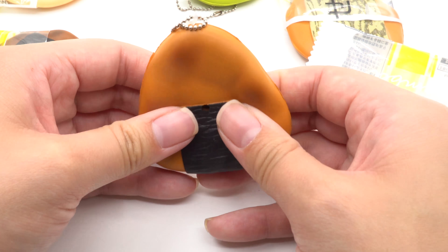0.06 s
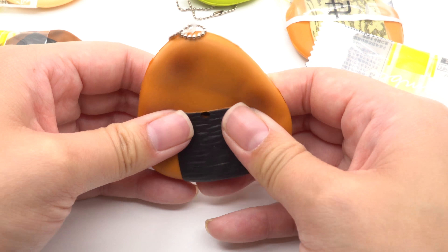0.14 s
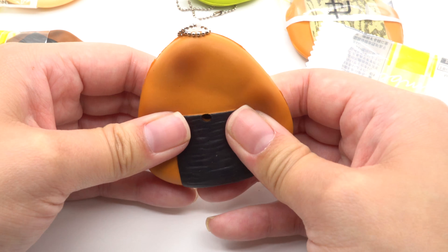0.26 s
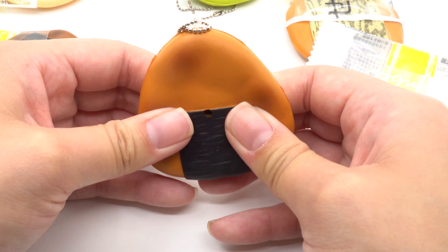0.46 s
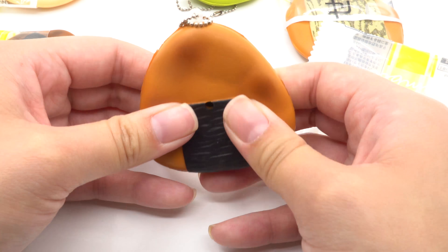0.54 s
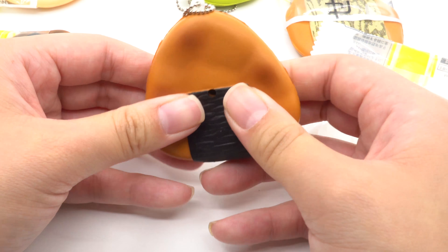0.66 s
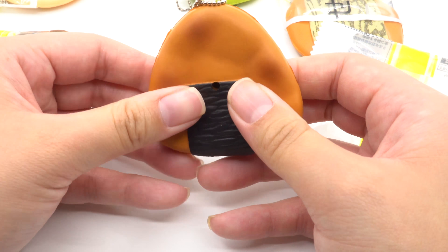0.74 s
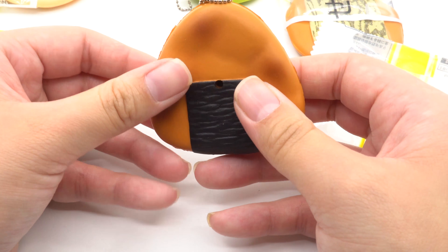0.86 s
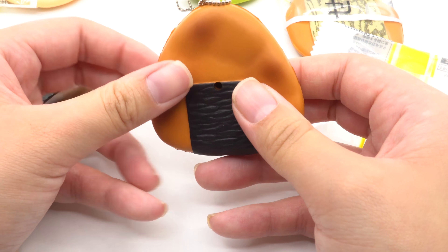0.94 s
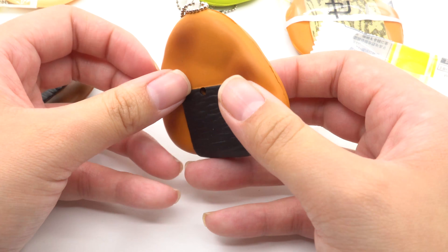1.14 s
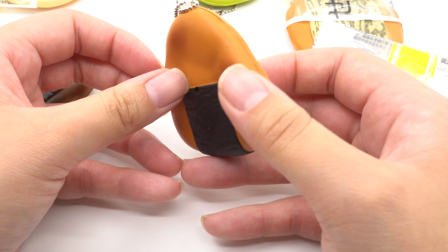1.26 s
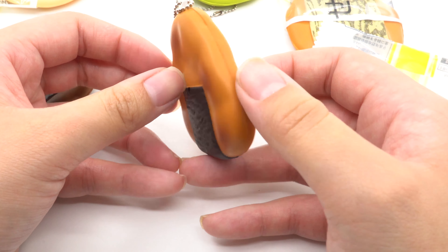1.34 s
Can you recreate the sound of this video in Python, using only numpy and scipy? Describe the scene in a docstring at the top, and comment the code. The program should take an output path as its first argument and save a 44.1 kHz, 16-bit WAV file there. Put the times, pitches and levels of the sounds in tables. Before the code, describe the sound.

A foam toy's stiff inner shell cracks once under the thumbs, then creaks faintly.

```python
"""A small quiet room: two thumbs press a foam toy with a stiff shell inside, close by, over a table.
The shell gives with a dull snap, then a sharp crack; each impulse excites its damped modes, and the
recoil of foam and hands adds a soft low thump. Before and after, stick-slip friction makes the shell
creak faintly, and the fingers rub and squeak on the toy's skin. Table and room reflect the snaps and
creaks. Low rumble, a little hum and hiss lie underneath."""
import sys
import numpy as np
from scipy import signal
from scipy.io import wavfile

SR = 44100
rng = np.random.default_rng(int(sys.argv[2]) if len(sys.argv) > 2 else 0)


def file_out(sig):
    """Save sig as 16-bit WAV at sys.argv[1]."""
    # one column per channel
    cols = np.atleast_2d(sig).T
    # limit, then scale
    lim = np.clip(cols, -1, 1)
    pcm = np.round(lim * 32767).astype(np.int16)
    wavfile.write(sys.argv[1], SR, pcm)


N = 61739
T = np.arange(N) / SR
AGE = np.arange(SR // 2) / SR  # time since an impulse, t/s

# spectrum of the room's steady noise: f/Hz, relative spectral density/dB
AIR_SPECTRUM = [(13, -31), (22, -12.5), (74, -8.5), (278, -19), (319, -24), (432, -23.5), (539, -45),
                (602, -23.5), (1070, -30), (1860, -31), (2390, -32.5), (2590, -34), (5610, -36.5),
                (10000, -38), (16000, -39)]
# left-right coherence of that noise: f/Hz, coherence
AIR_COHERENCE = [(100, 1), (500, 0.45), (1500, 0.2), (5000, 0.17), (15000, 0.18)]
# tones of the hum: f/Hz, level/dB
HUM_TONES = [(98, -61.5), (599, -78)]
# envelope of the rumble: t/s, level/dB
RUMBLE_ENVELOPE = [(0, -62), (.1, -61.5), (.2, -52), (.45, -65), (.55, -55), (.78, -77), (.85, -50),
                   (.92, -56), (1.05, -59), (1.11, -49), (1.19, -69), (1.25, -45), (1.305, -52),
                   (1.345, -45.5), (1.4, -53)]
# soft low bumps of the hands: centre t/s, level/dB, f/Hz, half-width/s
HAND_BUMPS = [(0.05, -53, 140, 0.066), (0.345, -63, 130, .025), (0.51, -56.5, 128, 0.12),
              (0.845, -46.5, 80, 0.014), (0.99, -59, 160, .03)]
# modes of the shell, damped by the foam: f/Hz, level/dB, T60/s
SHELL_MODES = [(856, -8.5, 0.019), (1063, -16.5, 0.039), (1532, -13.5, 0.048), (1869, -6, 0.015),
               (2173, -14.5, 0.036), (3560, -13, 0.0034), (4444, -21.5, 0.015)]
# creaks as the grip shifts: t/s, gain/dB, cutoff f/Hz, decay time/s, patch f/Hz, patch level/dB
SHELL_CREAKS = [(0.057, -56, 7000, .003, 800, 7), (0.0816, -51, 9000, 0.0012, 830, -3),
                (0.094, -57, 8950, .004, 870, 5), (0.557, -52, 2520, 0.0073, 1770, -6),
                (0.663, -46, 2180, 0.013, 870, 0), (0.7654, -43.5, 1930, 0.0072, 886, 1.5),
                (0.7696, -45, 1750, 0.0092, 1840, 5.5), (0.879, -52, 3500, .004, 2480, -7),
                (1.075, -50.5, 2040, 0.011, 740, -1.5), (1.085, -46, 1930, 0.0051, 660, 1.5)]
# reflection off the table: left delay/s, right delay/s, gain/dB
TABLE_ECHOES = [(.00124, 0.0015, -22)]
# scattering from hands and nearby things: f/Hz, gain/dB, T60/s
NEAR_SCATTER = [(123, -23, 0.074), (424, 13, 0.017), (880, 20, 0.057), (1300, 21, .055), (1900, 23.5, 0.15),
                (2820, 20.5, 0.048), (4070, 14, 0.073), (8100, 7.5, 0.079), (15000, 1, .07)]
# reverberation of the room: f/Hz, gain/dB, T60/s
ROOM_REVERB = [(101, 8, .45), (214, 13.5, 0.79), (400, 11, 0.58), (850, 11.5, 0.21), (1410, 11, 0.37),
               (2140, 19, 0.23), (2840, 3.5, 0.26), (4160, 1.5, 0.39), (7750, -7.5, 0.4),
               (14900, -10, 0.11)]
# left-right coherence of reflections and rubs: f/Hz, coherence
DIFFUSE_COHERENCE = [(100, 1), (380, 1), (700, 0.7), (1300, 0.24), (2400, 0.057), (5000, 0.094),
                     (15000, 0.37)]
# strokes of the fingers: centre t/s, level/dB, half-width/s
FINGER_RUBS = [(0.064, -63, 0.0061), (0.081, -61, 0.0041), (0.099, -60, 0.012), (0.672, -64, 0.023),
               (0.711, -62, 0.012), (0.771, -63.5, 0.029), (0.889, -67, .02), (1.104, -70, 0.03)]
# spectrum of their friction noise: f/Hz, relative spectral density/dB
RUB_SPECTRUM = [(300, -20), (900, -7), (2500, -3.5), (6500, 2.5), (10000, -6), (16000, -26)]
# snaps of the shell, where the patch that gives way rings at its own pitch: t/s, gain/dB, cutoff f/Hz,
# tick gain/dB, diffuse gain/dB, patch f/Hz, patch level/dB, patch T60/s, pop level/dB
SHELL_SNAPS = [(0.2487, -17, 4130, 3, -1.5, 1686, -2, 0.012, -6.5),
               (0.2682, -9.5, 12200, -1.5, 1, 2000, -12, 0.046, 5)]
# squeaks of skin on the toy: centre t/s, level/dB, f/Hz, half-width/s
SKIN_SQUEAKS = [(1.0855, -55.5, 1514, .0045), (1.120, -59, 2405, 0.0056)]


def from_db(db):
    """Amplitude ratio of a level: tenfold for every 20 dB."""
    return 10 ** (np.asarray(db) / 20)


def at_hz(points, hz):
    """Interpolation of a table's columns on a logarithmic frequency axis."""
    grid, *columns = np.transpose(points)
    return [np.interp(np.log(hz), np.log(grid), column) for column in columns]


def drift(rate_hz):
    """Random modulation: linear interpolation between unit Gaussian values."""
    knots = rng.standard_normal(N // 20)
    return np.interp(T * rate_hz, np.arange(len(knots)), knots)


def butter(x, hz, kind, order=2):
    """Butterworth filter: a maximally flat passband."""
    sections = signal.butter(order, np.clip(hz, 10, SR * .49), kind, fs=SR, output="sos")
    return signal.sosfilt(sections, x + 1e-18)


def impulse(s):
    """A unit impulse delayed by s seconds: equal energy at all frequencies."""
    return signal.unit_impulse(len(AGE), int(s * SR))


def through(x, response):
    """Convolution: the output of a linear system with this impulse response."""
    return signal.fftconvolve(np.atleast_2d(x), np.atleast_2d(response), axes=1)[:, :len(AGE)]


def placed(x, s):
    """Time shift of a short stereo sound to its onset in the scene."""
    return np.pad(x, [(0, 0), (int(s * SR), N)])[:, :N]


def noise_bands(coherence, size):
    """Half-octave stereo noise bands; the ratio of mid to side power sets their coherence."""
    edges = 22 * 2 ** (np.arange(20) / 2)
    white = rng.standard_normal((2, 2, size + SR // 4))
    for k, (low, high) in enumerate(zip(edges, edges[1:])):
        mid, side = butter(white[k % 2], [low, high], "band")[:, -size:]
        hz = np.sqrt(low * high)
        alike = at_hz(coherence, hz)[0]
        yield hz, np.sqrt((1 + alike) / 2) * mid + np.sqrt((1 - alike) / 2) * side * [[1], [-1]]


def coloured(spectrum, coherence):
    """Spectral shaping: weighted bands sum to stationary stereo noise of rms 1."""
    noise = sum(from_db(at_hz(spectrum, hz)[0]) * band for hz, band in noise_bands(coherence, N))
    return noise / np.sqrt(np.mean(noise ** 2))


def background():
    """Superposition of broadband room noise, phase-modulated hum and a rumble of wavering level."""
    hum = sum(from_db(db) * np.sin(2 * np.pi * hz * T + 1.22 * drift(7.07)) for hz, db in HUM_TONES)
    rumble_hz, waver_db = 51, 4
    rumble_db = np.interp(T, *np.transpose(RUMBLE_ENVELOPE)) + waver_db * drift(11.66)
    rumble = from_db(rumble_db) * np.sin(2 * np.pi * rumble_hz * T + .8 * drift(9.45))
    return from_db(-54.5) * coloured(AIR_SPECTRUM, AIR_COHERENCE) + np.sqrt(2) * (hum + rumble)


def swell(s, db, half_s):
    """Gaussian envelope, falling to 1/e at half_s either side of its centre."""
    return from_db(db) * np.exp(-((T - s) / half_s) ** 2)


def tone_pulses(table, waver_hz, waver_rad):
    """Gaussian tone pulses, their spectra broadened by random phase modulation."""
    return sum(swell(s, db, half_s) * np.sin(2 * np.pi * hz * T + waver_rad * drift(waver_hz))
               for s, db, hz, half_s in table)


def hand_bumps():
    """Soft contact: a slowly changing force holds only low frequencies."""
    return tone_pulses(HAND_BUMPS, waver_hz=180, waver_rad=0.3)


def mode(hz, db, t60):
    """Free vibration of a damped oscillator, falling 60 dB in t60 seconds."""
    return from_db(db) * np.sin(2 * np.pi * hz * AGE) * np.exp(-np.log(1000) * AGE / t60)


def shell_ring():
    """Modal superposition: the foam's dull knock plus shell modes of alternating sign."""
    foam = mode(hz=388, db=-9.5, t60=0.0063)
    return foam + sum((-1) ** k * mode(hz, db, t60) for k, (hz, db, t60) in enumerate(SHELL_MODES))


def direct_path():
    """Direct sound interferes with the table's echo; so small a source radiates little bass."""
    echo = sum(from_db(db) * np.array([impulse(left), impulse(right)])
               for left, right, db in TABLE_ECHOES)
    return butter(impulse(0) + echo, hz=247, kind="high")


def reflections(table, build_s):
    """Diffuse field: reflections build up, then absorption makes each band decay exponentially."""
    out = 0
    for hz, band in noise_bands(DIFFUSE_COHERENCE, len(AGE)):
        db, t60 = at_hz(table, hz)
        tail = band * (1 - np.exp(-(AGE / build_s) ** 2)) * from_db(-60 * AGE / t60)
        out = out + from_db(db) * tail * band.std() / np.sqrt(np.sum(tail ** 2) / 2)
    return out


def creaks(ring, direct, diffuse):
    """Stick-slip friction: one slip and a dying random train of smaller ones drive the shell."""
    slips_per_s, diffuse_db = 780, 3
    out = 0
    for s, db, cutoff_hz, decay_s, patch_hz, patch_db in SHELL_CREAKS:
        slipping = rng.random(len(AGE)) < slips_per_s / SR
        slips = impulse(0) + slipping * rng.normal(0, 0.42, len(AGE)) * np.exp(-AGE / decay_s)
        force = butter(butter(slips, cutoff_hz, "low"), hz=450, kind="high", order=1)
        body = through(ring + mode(patch_hz, patch_db, t60=0.015), direct)
        out = out + from_db(db) * placed(through(force, body + from_db(diffuse_db) * diffuse), s)
    return out


def finger_rubs():
    """Sliding friction: skin passing over the toy makes short swells of grainy noise."""
    grain_db = 4
    envelope = sum(swell(*rub) for rub in FINGER_RUBS)
    return envelope * from_db(grain_db * drift(600)) * coloured(RUB_SPECTRUM, DIFFUSE_COHERENCE)


def snaps(ring, direct, diffuse):
    """Sudden release of elastic energy: a tick, a one-swing pop and ringing modes, with reflections."""
    tick = from_db(2.5) * butter(impulse(0), hz=2460, kind="high", order=1)
    tick = butter(tick, hz=10200, kind="low")
    out = 0
    for s, db, cutoff_hz, tick_db, diffuse_db, patch_hz, patch_db, patch_t60, pop_db in SHELL_SNAPS:
        pop = mode(hz=1590, db=pop_db, t60=0.0015)
        snap = pop + ring + mode(patch_hz, patch_db, patch_t60) - from_db(tick_db) * tick
        heard = through(snap, direct) + from_db(diffuse_db) * diffuse
        out = out + from_db(db) * placed(butter(heard, cutoff_hz, "low", order=1), s)
    return out


def thump():
    """Recoil: foam and hands swing as a damped low-frequency oscillator."""
    onset_s, hz, rise_s, t60 = .2745, 99.7, 0.011, 0.15
    age = np.maximum(T - onset_s, 0)
    envelope = (1 - np.exp(-age / rise_s)) * from_db(-60 * age / t60)
    return from_db(-28.5) * envelope * np.sin(2 * np.pi * hz * age)


def skin_squeaks():
    """Friction-excited vibration: skin on the toy gives tiny tones of unsteady pitch."""
    return tone_pulses(SKIN_SQUEAKS, waver_hz=270, waver_rad=0.84)


def scene():
    """Superposition of all sources; a level difference sets the toy slightly to the right."""
    ring, direct = shell_ring(), direct_path()
    diffuse = reflections(NEAR_SCATTER, build_s=0.001) + reflections(ROOM_REVERB, build_s=0.011)
    toy = snaps(ring, direct, diffuse) + creaks(ring, direct, diffuse)
    hands = finger_rubs() + skin_squeaks() + hand_bumps()
    return toy * from_db([[-.5], [.5]]) + thump() + hands + background()


def record(dry):
    """Band limiting: an elliptic low-pass filter cuts steeply above 16 kHz."""
    return signal.sosfilt(signal.ellip(10, .1, 80, 16000, fs=SR, output="sos"), dry)


dry = scene()
out = record(dry)
file_out(out)
```